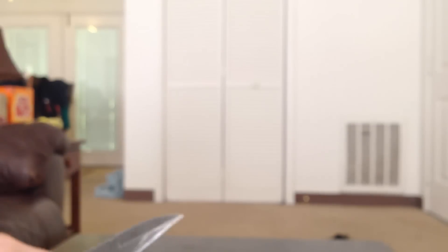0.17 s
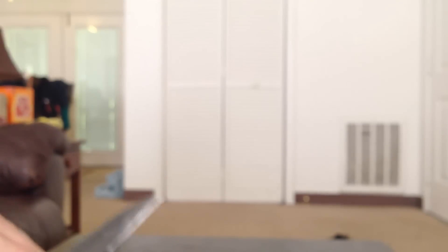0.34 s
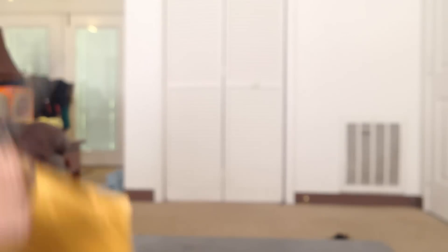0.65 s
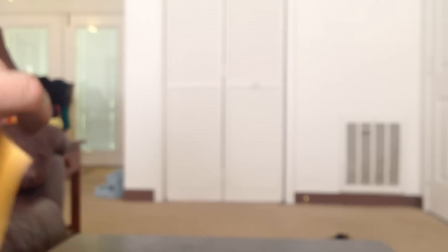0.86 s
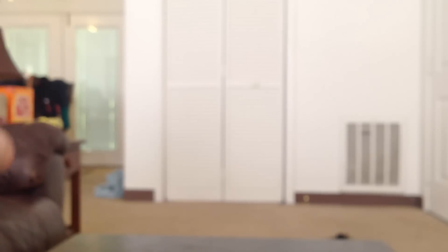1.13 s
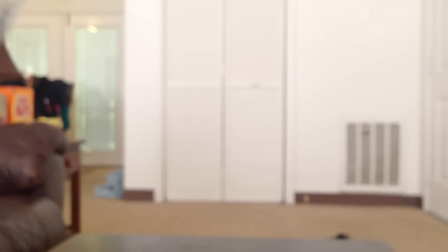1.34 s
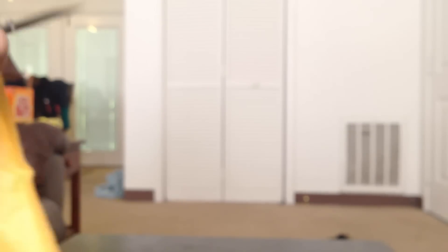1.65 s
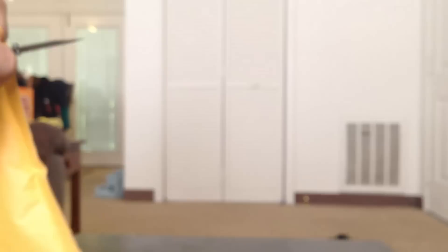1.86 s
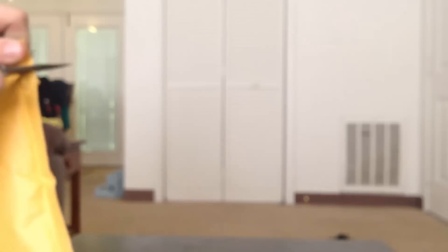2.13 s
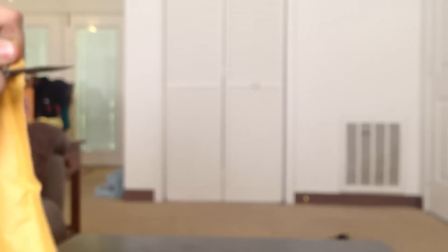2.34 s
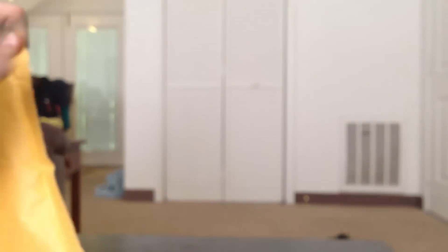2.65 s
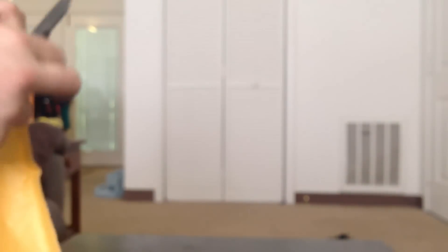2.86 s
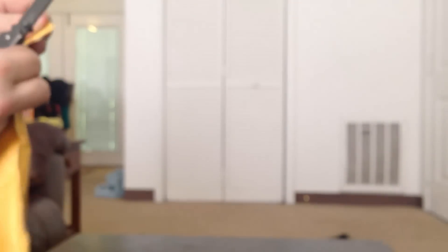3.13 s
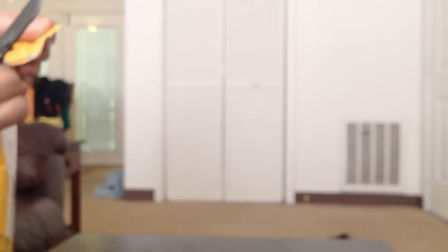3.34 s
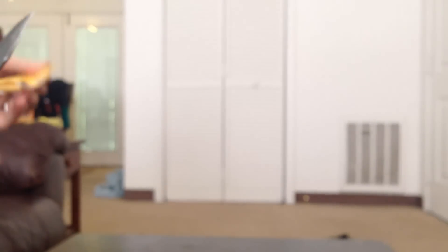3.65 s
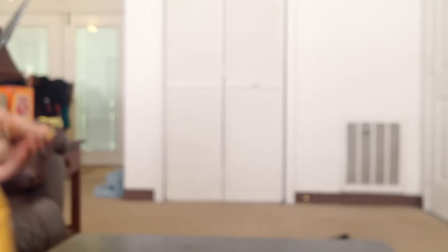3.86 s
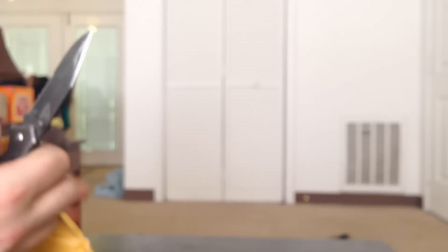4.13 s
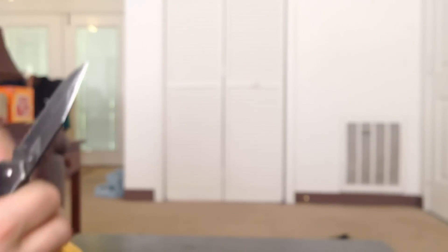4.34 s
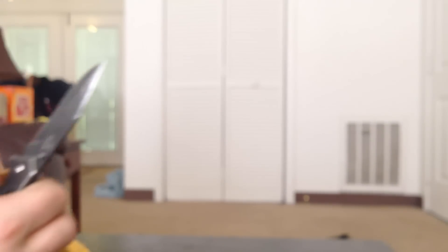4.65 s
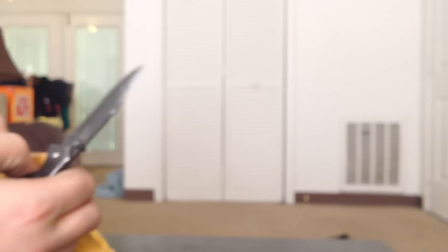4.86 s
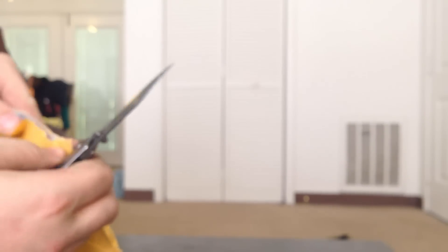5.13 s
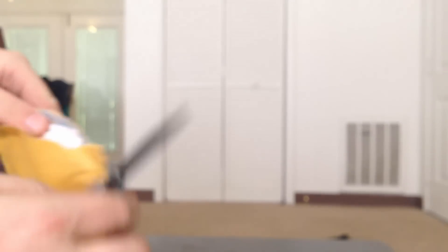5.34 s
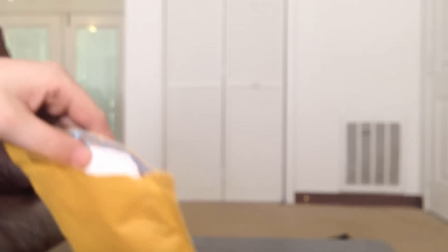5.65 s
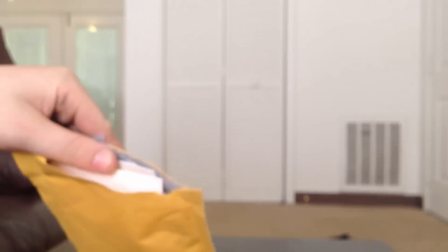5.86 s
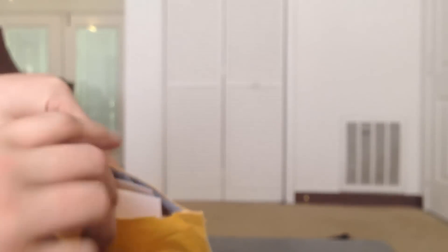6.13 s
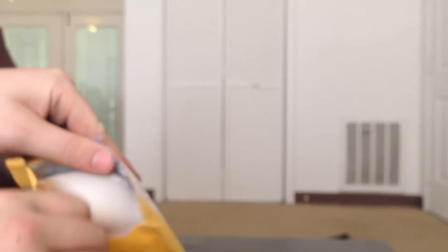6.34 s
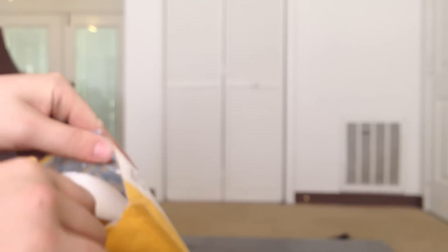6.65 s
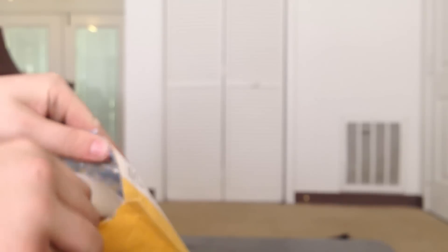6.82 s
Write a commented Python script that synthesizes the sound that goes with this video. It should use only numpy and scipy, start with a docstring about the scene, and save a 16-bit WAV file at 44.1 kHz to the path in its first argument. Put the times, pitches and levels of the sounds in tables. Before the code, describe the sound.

Dry, crisp paper handling comes first, with sharp creases and sliding fingers. Short gritty knife cuts and dull pouch thuds follow, then a bright ripping tear. Handling softens before the knife lands in two hard, ringing, buzzing clatters, the loudest moment. The mailer then rustles as it is pulled open. Close microphone, small room reverberation, low background rumble.

```python
"""A padded paper mailer is slit with a folding knife, close to a small microphone in a carpeted room.
Creases snap as short noise bursts; sliding hands, sawing blade and tearing strip are grainy band noise.
The blade's tugs sound the pouch and a finger taps the handle, both as quickly damped modes.
The knife goes down on the table in two clattering knocks: cracks, ringing modes and buzzing noise.
The mailer is then pulled open; shaped noise gives a low room rumble throughout."""
import sys
import numpy as np
from scipy import signal
from scipy.fft import rfft, irfft
from scipy.io import wavfile
from scipy.ndimage import uniform_filter1d, map_coordinates

SR = 44100
rng = np.random.default_rng(int(sys.argv[2]) if len(sys.argv) > 2 else 0)


def waveform_to_disk(signal):
    """Save audio, clipped to [-1, 1], as 16-bit WAV at the path in sys.argv[1]."""
    frames = np.transpose(np.atleast_2d(signal))
    scaled = np.clip(frames, -1, 1) * 32767
    samples = np.round(scaled).astype(np.int16)
    wavfile.write(sys.argv[1], SR, samples)


N = 308183
T = np.arange(N) / SR
TOP_HZ = 11050  # upper limit of the recorder

# noise bands of paper and knife, body to top: low f/Hz, high f/Hz, ring time [multiple of a crack's t60]
BANDS = [(268, 1087, 0.8), (1123, 2730, 2.8), (2300, 5660, 2.5), (5680, 10120, 2.5)]


def undb(db):
    """Decibels to gain."""
    return 10 ** (np.asarray(db) / 20)


def unit(x):
    """Scale to rms 1."""
    return x / np.sqrt(np.mean(x ** 2))


def add(out, s, sound):
    """Mix a sound in at a time in seconds."""
    i = int(s * SR)
    out[i:i + len(sound)] += sound[:N - i]


def band(x, lo_hz, hi_hz, order=3):
    """Causal band-pass."""
    sos = signal.butter(order, [lo_hz, hi_hz], "band", fs=SR, output="sos")
    return signal.sosfilt(sos, x)


def colour(x, points):
    """Shape a spectrum by (f/Hz, level/dB) points, joined by straight lines over log frequency."""
    hz, db = np.transpose(points)
    f = np.maximum(np.fft.rfftfreq(2 * N, 1 / SR), 1)
    gain = undb(np.interp(np.log(f), np.log(hz), db))
    return irfft(rfft(x, 2 * N) * gain)[:N]


def fade(t, t60):
    """Exponential decay, 60 dB down after t60."""
    return np.exp(-np.log(1000) * t / t60)


def octaves_above(hz):
    """How far the centre of each band lies above a frequency."""
    centres = np.array([np.sqrt(lo * hi) for lo, hi, _ in BANDS])
    return np.log2(centres / hz)


def crack(band_db, t60, after_db, after_t60):
    """A sharp burst and a weak, grainy after-shake in each band; levels are rms over 5 ms."""
    t = T[:SR // 10]
    window = .005 * SR
    step = 45  # samples, about 1 ms for each grain
    grain = unit(np.repeat(undb(6 * rng.standard_normal(len(t) // step)), step))
    out = 0
    for (lo, hi, slow), db in zip(BANDS, band_db):
        after_shake = undb(after_db) * grain * fade(t, after_t60)
        shape = fade(t, t60 * slow) + after_shake
        burst = band(shape * rng.standard_normal(len(t)), lo, hi)
        out = out + undb(db) * burst * np.sqrt(window / np.sum(burst ** 2))
    return out


def ring(modes, detune, scatter_db, contact_hz=TOP_HZ):
    """Damped modes; each blow weights and tunes them anew, and a soft contact misses the high ones."""
    t = T[:SR // 2]
    out = 0
    draws = rng.standard_normal((len(modes), 2))
    for k, ((hz, db, t60), (shift, weight)) in enumerate(zip(modes, draws)):
        size = undb(db + scatter_db * weight) / np.hypot(1, (hz / contact_hz) ** 8)
        tone = np.sin(2 * np.pi * hz * (1 + detune * shift) * t)
        out = out + (-1) ** k * size * fade(t, t60) * tone
    return out


def fibres(rate, spread_db, grain_s, smooth):
    """Envelope of paper fibres letting go: many tiny breaks and a few large ones over even friction."""
    size = undb(spread_db * np.minimum(rng.exponential(size=N), 5))
    breaks = (rng.random(N) < rate / SR) * size ** 2  # rate is breaks per second
    power = signal.lfilter([1], [1, -np.exp(-1 / (grain_s * SR))], breaks)
    return unit(np.sqrt(power / power.mean() + smooth))


def friction(levels, grain, trims_db):
    """Grainy paper noise, with a level in time for each band."""
    out = 0
    for (lo, hi, _), level, trim in zip(BANDS, levels, trims_db):
        noise = unit(band(grain * rng.standard_normal(N), lo, hi))
        out = out + level * undb(trim) * noise
    return out


def flex(x, spread_db, width_hz, hold_s):
    """The sheet bends, so its broad resonances come and go: a random gain over frequency and time."""
    f, t, spectra = signal.stft(x, SR, nperseg=512)
    field = rng.standard_normal((200, 800))
    places = np.meshgrid(f / width_hz, t / hold_s, indexing="ij")
    db = spread_db * map_coordinates(field, places, order=1, mode="mirror")
    return signal.istft(spectra * undb(db), SR)[1][:N]


def strokes(table, build_db_per_s):
    """Force on the paper: each stroke sets in, grows while it is held and lets go."""
    edge_db = 28.5  # drop one attack time before the hold, or one release time after it
    out = 0
    for s, attack, hold, release, db in table:
        slack = np.maximum(np.maximum((s - T) / attack, (T - s - hold) / release), 0)
        build = build_db_per_s * (np.clip(T - s, 0, hold) - hold / 2)
        out = out + undb(np.maximum(db + build - edge_db * slack, -200))
    return out


def room_rumble():
    """The room behind the mailer: steady noise, strongest in the low range."""
    # spectrum of the room noise: f/Hz, relative level/dB [per Hz]
    room = [(25, -29), (45, -14.5), (70, -16.5), (106, 0.5), (150, -8), (230, -5.5), (330, -11.5),
            (520, -20.5), (800, -20.5), (1400, -25.5), (3000, -38.5), (6000, -38), (11000, -35.5)]
    return undb(-54.5) * unit(colour(rng.standard_normal(N), room))


def hands():
    """Fingers and the contents slide over the paper in swells; taut paper is brighter than slack."""
    # slides, levels ahead of the band trims: t/s [fastest moment], rise t/s, fall t/s, level/dB [at 4 kHz],
    # brightness [dB per octave]
    slides = [(0.15, .35, 0.55, -71.5, -7.5), (0.47, 0.18, 0.14, -50, 1), (0.57, 0.13, 0.26, -47.5, 3.5),
              (1.05, 0.082, 0.075, -42, -0.5), (1.43, 0.08, 0.05, -46.5, 1.5), (1.64, 0.087, 0.055, -56, 4),
              (1.82, .06, 0.082, -59, -1), (2.0, 0.083, .1, -54, -2.5), (2.36, 0.12, 0.14, -50.5, 0.5),
              (2.66, .1, 0.17, -53.5, 1.5), (3.0, 0.061, 0.042, -50, 1), (3.17, 0.14, 0.18, -41.5, -.5),
              (3.924, 0.062, 0.21, -48.5, 1.5), (4.07, .1, 0.07, -51, 0.5), (4.25, 0.16, 0.095, -49, -0.5),
              (4.47, 0.056, 0.097, -56.5, 0.5), (4.645, 0.09, 0.11, -54.5, -1),
              (4.703, 0.021, 0.02, -38.5, 3.5), (4.85, 0.11, 0.045, -52, -0.5),
              (4.97, 0.085, 0.064, -52.5, -3), (5.072, 0.021, 0.04, -36.5, 1), (5.3, 0.31, 0.33, -49.5, 1),
              (5.62, 0.19, 0.26, -41, 1), (6.37, 0.18, .06, -43, .5), (6.53, 0.16, 0.17, -49, -1),
              (6.74, .08, 0.075, -51.5, -2), (6.87, 0.04, 0.051, -50.5, -0.5),
              (6.97, 0.082, 0.092, -49.5, -2)]
    edge_db, roundness = 13.5, 1.41  # drop after one rise or fall time; exponent of the swell
    holding_db = -65.5  # the paper stirs even when it is only held
    t = T[::100]
    power = undb(holding_db) ** 2
    for s, rise, fall, db, brightness in slides:
        away = np.abs(np.where(t < s, (s - t) / rise, (t - s) / fall))
        swell = db - edge_db * away ** roundness
        power = power + undb(swell + brightness * octaves_above(4000)[:, None]) ** 2
    levels = [np.interp(T, t, np.sqrt(p)) for p in power]
    sliding = fibres(rate=460, spread_db=3.0, grain_s=0.0023, smooth=1.8)
    crinkles = fibres(rate=40, spread_db=2.5, grain_s=.0007, smooth=0)
    grain = np.hypot(sliding, 0.39 * crinkles)  # sparse crinkles over the even sliding
    rustle = friction(levels, grain, trims_db=(-13.5, -7.5, -7.5, -9.5))
    return flex(rustle, spread_db=4, width_hz=445, hold_s=.07)


def creases():
    """Stiff paper buckles in single snaps, and a few fibres crackle on after each."""
    # snaps: t/s, level/dB [at the strongest frequency], strongest f/Hz, fall to either side [dB per octave]
    snaps = [(0.6282, -29.5, 5060, 3), (0.698, -43.5, 630.0, 1.5), (0.9298, -29, 2480, 7),
             (1.0024, -28, 1870, 7), (1.016, -27.5, 2900.0, 7), (1.0406, -29, 5100.0, 7),
             (1.1985, -34.5, 930.0, 5.5), (1.4123, -31.5, 2580, 5), (1.435, -36, 2600.0, 7),
             (1.453, -25, 4400, 9), (1.9126, -38, 1590, 10), (2.006, -32.5, 2200.0, 10),
             (2.013, -35.5, 880.0, 3), (2.0385, -24, 990, 6.5), (2.0622, -23.5, 2280, 5.5),
             (2.1631, -29, 2180, 4), (2.1749, -32, 2090, 7), (2.2219, -27.5, 633, 4),
             (2.3581, -27.5, 1300.0, 6), (2.4496, -36, 1600.0, 5), (2.502, -32.5, 500.0, 5),
             (2.5213, -33, 2400.0, 2), (2.5336, -28.5, 3120, 5.5), (2.714, -41, 4500.0, 3.5),
             (3.0366, -37, 8000.0, 0.5), (3.052, -31.5, 2400.0, 4), (3.1142, -25.5, 2500, 10),
             (3.1819, -33, 1800.0, 10), (3.1897, -24.5, 1870, 8), (3.217, -33, 2600.0, 6),
             (3.2307, -21.0, 2300.0, 9), (3.2421, -24, 3100.0, 7.5), (3.3845, -35, 830.0, 9),
             (3.5636, -29, 3800.0, 11), (3.9574, -36, 1400.0, 13), (4.181, -45, 2700.0, 4),
             (4.6847, -37.5, 8000.0, 1.5), (4.9925, -29.5, 6400.0, 4), (5.0561, -35, 5400.0, 4),
             (5.0941, -29.5, 2420, 14.5), (5.2205, -40.5, 880.0, 3.5), (5.6622, -38, 2200.0, 6),
             (6.214, -28.0, 2470, 4), (6.3217, -33.5, 8000.0, 0), (6.3454, -34.5, 4100.0, 0.5),
             (6.383, -37.5, 6000.0, 4), (6.652, -40.5, 700.0, 1.5), (6.8842, -33.5, 960, 11)]
    out = np.zeros(N)
    for s, db, peak_hz, fall in snaps:
        band_db = db - fall * np.abs(octaves_above(peak_hz))
        add(out, s, crack(band_db, t60=.0048, after_db=-21, after_t60=.05))
    return flex(out, spread_db=1.0, width_hz=626, hold_s=.04)


def cutting():
    """Fibres part along the blade, and each catch thumps the hollow pouch."""
    # blade strokes, levels ahead of the band trims: t/s [start of hold], attack t/s, hold t/s, release t/s,
    # level/dB [mid-hold]
    cuts = [(2.022, 0.026, 0.048, 0.15, -42.5), (2.195, 0.085, 0.073, 0.012, -40),
            (2.48, 0.14, 0.034, 0.035, -37)]
    # the blade catches and jerks the pouch: t/s, level/dB
    tugs = [(2.064, -30), (2.087, -19), (2.199, -28), (2.2152, -15.5), (2.2213, -19), (2.228, -37),
            (2.241, -22), (2.254, -26), (2.433, -21), (2.491, -26), (2.51, -19), (4.138, -37)]
    # modes of the pouch: f/Hz, relative level/dB, t60/s
    pouch = [(142, -9.5, 0.056), (300, -9, 0.073), (433, -28, 0.042), (560, -1, 0.023), (785, -12, 0.0063)]
    grain = fibres(rate=900, spread_db=3.4, grain_s=.0005, smooth=.12)
    force = [strokes(cuts, build_db_per_s=42)] * len(BANDS)
    sawing = friction(force, grain, trims_db=(-5, -3.5, -4.0, -5.5))
    out = flex(sawing, spread_db=3.0, width_hz=382, hold_s=0.029)
    for s, db in tugs:
        add(out, s, undb(db) * ring(pouch, detune=.09, scatter_db=1))
    return out


def tearing():
    """The end strip rips away in a dense run of breaking fibres, brighter the harder it is pulled."""
    # pulls, levels ahead of the band trims: t/s [start of hold], attack t/s, hold t/s, release t/s,
    # level/dB [mid-hold]
    pulls = [(3.248, 0.026, 0.045, 0.036, -35), (3.475, 0.18, 0.13, 0.11, -31),
             (3.74, 0.041, 0.041, 0.022, -33)]
    grain = fibres(rate=1000, spread_db=3, grain_s=.0005, smooth=.13)
    force = strokes(pulls, build_db_per_s=13)
    top = force * (force / force.max()) ** 0.17  # the top grows faster than the force
    rip = friction([force, force, force, top], grain, trims_db=(-16.5, -8, -5.5, -4.0))
    return flex(rip, spread_db=2.5, width_hz=378, hold_s=0.033)


def handle_tap():
    """A finger taps the knife handle: one short, hollow knock of damped modes."""
    # modes of the handle: f/Hz, relative level/dB, t60/s
    handle = [(704, -5, 0.025), (924, 2.5, 0.032)]
    tap_s, tap_db = 4.685, -29.5
    out = np.zeros(N)
    add(out, tap_s, undb(tap_db) * ring(handle, detune=.01, scatter_db=1))
    return out


def chatter(contact_hz, t60):
    """The loose knife buzzes against the table: decaying noise in its own broad resonances."""
    # resonances of the knife on the table: f/Hz, width f/Hz, relative level/dB
    resonances = [(2750, 420, 0), (3024, 230, -0.5), (3580, 110, -7), (3890, 1030, 3), (4460, 420, -5)]
    t = T[:SR // 3]
    out = 0
    for hz, width_hz, db in resonances:
        size = undb(db) / np.hypot(1, (hz / contact_hz) ** 12)
        noise = rng.standard_normal(len(t))
        out = out + size * unit(band(noise, hz - width_hz / 2, hz + width_hz / 2, order=2))
    return out * fade(t, t60)


def knife_down():
    """Handle and blade drop on the table and bounce; the deep bass is filtered out."""
    # contacts with the table: t/s, ring level/dB, upper f/Hz the contact excites, crack level/dB,
    # fall of the crack [dB per octave]
    contacts = [(5.7452, -16, 3170, -11, 5.5), (5.8302, -34, 1100, -39, 2.5), (5.8398, -25, 790, -15, 10),
                (5.915, -41, 500, -34, 12), (5.9649, -16, 1700, -13, 8.5), (5.978, -17, 5200, -11.5, 5),
                (6.0036, -22, 1500, -9.5, 12.5), (6.018, -25.5, 3430, -17, 14)]
    # modes of the table: f/Hz, relative level/dB, t60/s
    table_modes = [(131, -12, .2), (165, -13, .2), (199, -12, .2), (231, -14, .28), (292, -8, .22),
                   (412, -13, .16), (462, -12, .14), (497, -7, .16), (550, -11, .15), (659, -9, .19),
                   (712, -15, .17), (800, -19, .18), (975, -13, .14), (1010, -11, .17), (1103, -12, .18),
                   (1206, -17, .18), (1404, -13, .2), (1870, -14, .14)]
    crack_knee = 0.31  # the crack starts to fall at this share of the contact frequency
    out = np.zeros(N)
    for s, ring_db, contact_hz, crack_db, fall in contacts:
        band_db = crack_db - fall * np.maximum(octaves_above(crack_knee * contact_hz), 0)
        add(out, s, crack(band_db, t60=.011, after_db=-36, after_t60=.05))
        ringing = ring(table_modes, detune=.0008, scatter_db=2, contact_hz=contact_hz)
        add(out, s, undb(ring_db) * ringing)
        add(out, s, undb(ring_db - 2) * chatter(contact_hz, t60=.095))
    return signal.sosfilt(signal.butter(2, 90, "high", fs=SR, output="sos"), out)


def reverberate(x, diffuse, first_s=0.0017, build_s=0.00071):
    """Fixed wall echoes mixed with a smooth, diffuse noise wash."""
    # reverberation of the room: low f/Hz, high f/Hz, t60/s, level/dB [of the band sent to the walls]
    walls = [(122, 308, 0.3, -4), (371, 1010, 0.22, -10), (1045, 2490, 0.26, -5), (2810, 5170, 0.26, -8),
             (6140, 9020, 0.21, -7)]
    t = T[:SR // 2]
    onset = np.clip((t - first_s) / build_s, 0, 1)
    out = x
    for lo, hi, t60, db in walls:
        decay = onset * fade(t, t60) ** 2  # of power
        decay = decay / decay.sum()
        sent = undb(db) * band(x, lo, hi)
        echo_pattern = np.sqrt(decay) * rng.standard_normal(len(t))
        echoes = signal.fftconvolve(sent, echo_pattern)[:N]
        energy = np.abs(signal.fftconvolve(sent ** 2, decay)[:N])
        wash = np.sqrt(energy) * unit(band(rng.standard_normal(N), lo, hi))
        out = out + np.sqrt(1 - diffuse) * echoes + np.sqrt(diffuse) * wash
    return out


def gain_control(x, ceiling_db, recovery_db_per_s):
    """Loud blows push the gain down at once; it creeps back afterwards."""
    power = uniform_filter1d(x ** 2, size=220)  # over 5 ms
    over_db = np.maximum(10 * np.log10(np.abs(power) + 1e-12) - ceiling_db, 0)
    creep = recovery_db_per_s * T
    return x * undb(creep - np.maximum.accumulate(over_db + creep))


def scene():
    """Paper and knife over the steady room rumble; the knocks are given a little less reverberation."""
    # the stiff paper radiates best in the presence range: f/Hz, level/dB
    paper_colour = [(300, -2.5), (1300, -0.5), (1900, 2.5), (2500, -0.5), (3100, 1), (4300, 1),
                    (6500, -0.5), (10000, -2)]
    rumble = room_rumble()
    rubbing = colour(hands() + cutting() + tearing(), paper_colour)
    paper = reverberate(rubbing + creases() + handle_tap(), diffuse=0.74)
    knocks = knife_down()
    knock_reverb = reverberate(knocks, diffuse=0.37) - knocks
    knife = knocks + undb(-1.5) * knock_reverb
    return (paper + knife + rumble)[None]


def record(dry):
    """The microphone colours the sound; the recorder rides the gain and cuts the top."""
    # microphone colour: f/Hz, level/dB
    mic = [(60, 3), (300, -0.5), (600, 1), (1000, -4), (1500, -7.5), (2200, -3), (3000, 0), (4500, -1),
           (6500, -1.5), (8500, -5.5), (10500, -2)]
    held = gain_control(colour(dry[0], mic), ceiling_db=-14.0, recovery_db_per_s=12.0)
    top_cut = signal.ellip(10, .2, 60, TOP_HZ, fs=SR, output="sos")
    return signal.sosfilt(top_cut, held)[None]


dry = scene()
out = record(dry)
waveform_to_disk(out)
```